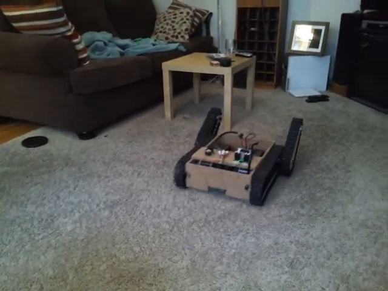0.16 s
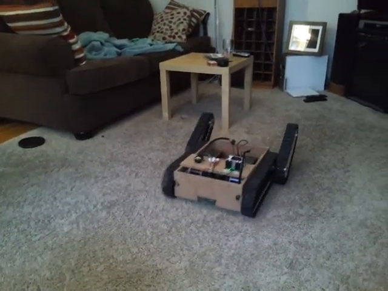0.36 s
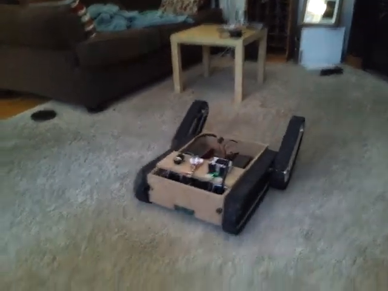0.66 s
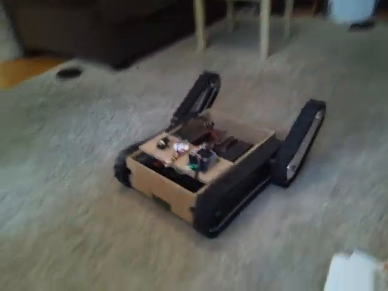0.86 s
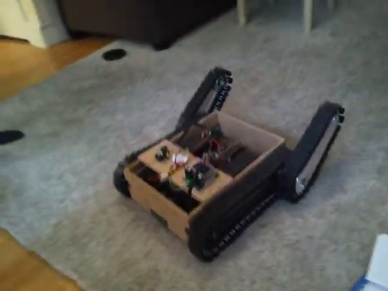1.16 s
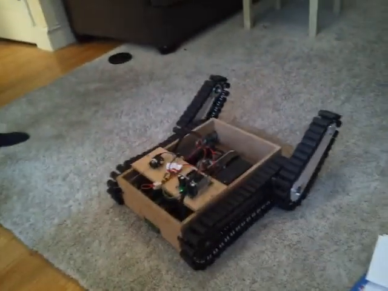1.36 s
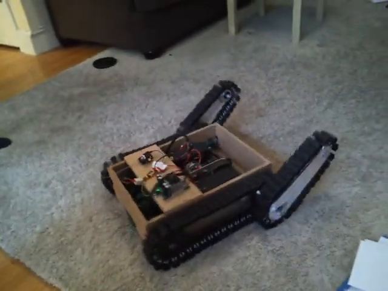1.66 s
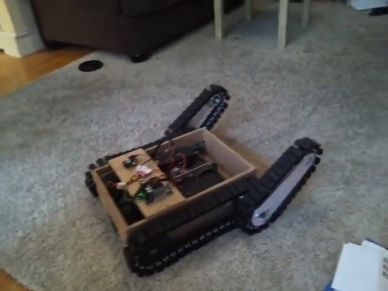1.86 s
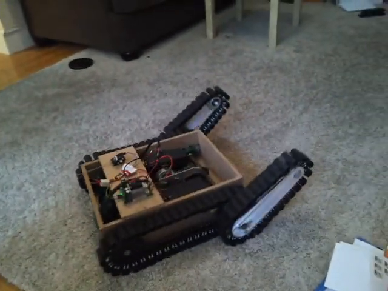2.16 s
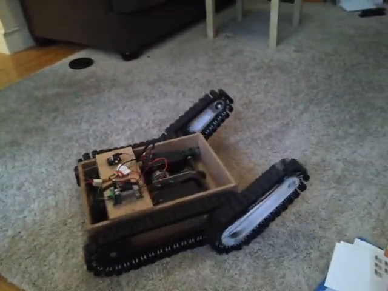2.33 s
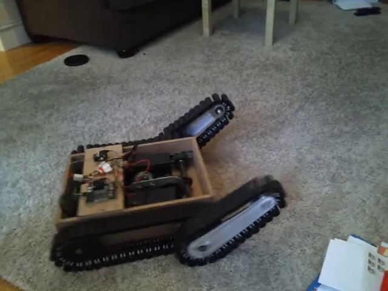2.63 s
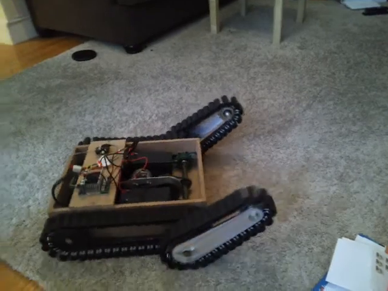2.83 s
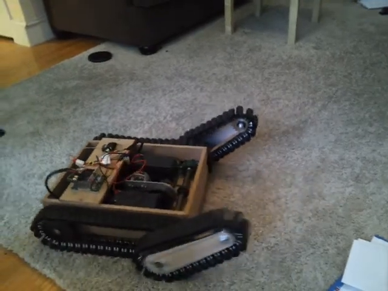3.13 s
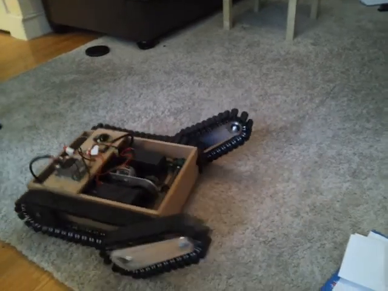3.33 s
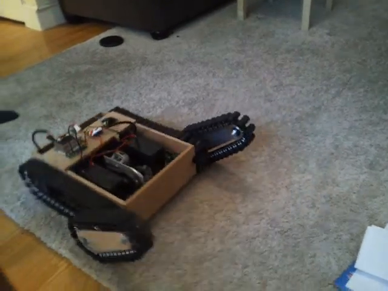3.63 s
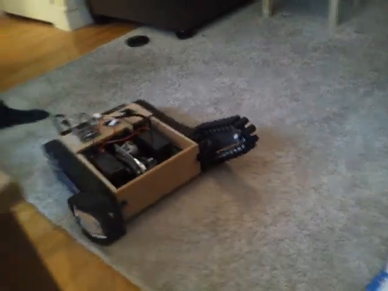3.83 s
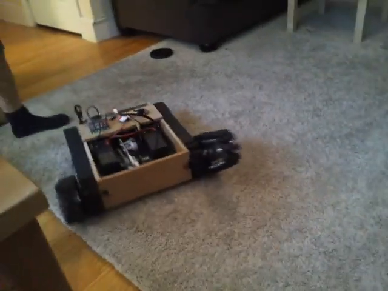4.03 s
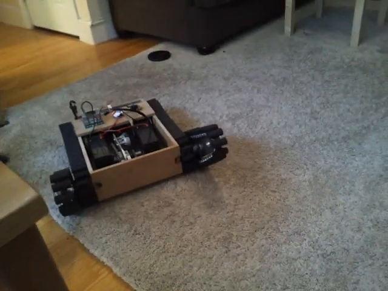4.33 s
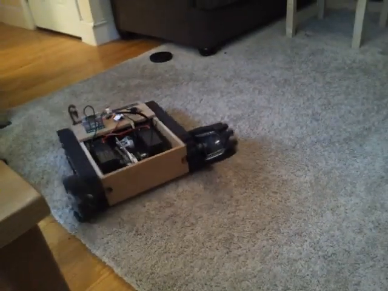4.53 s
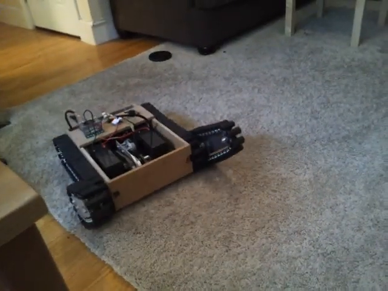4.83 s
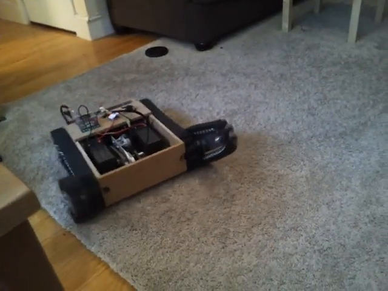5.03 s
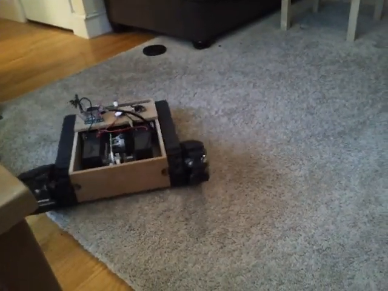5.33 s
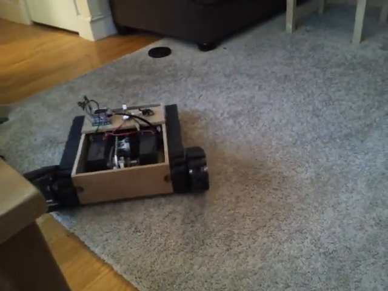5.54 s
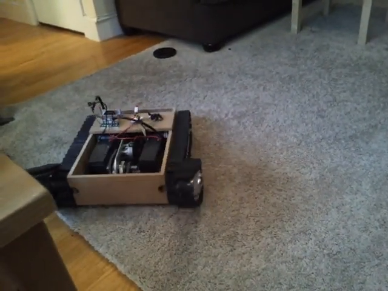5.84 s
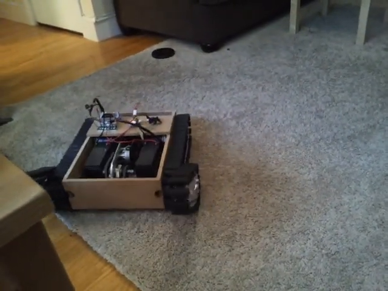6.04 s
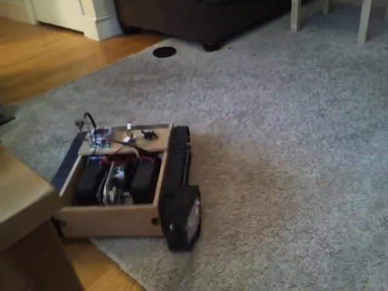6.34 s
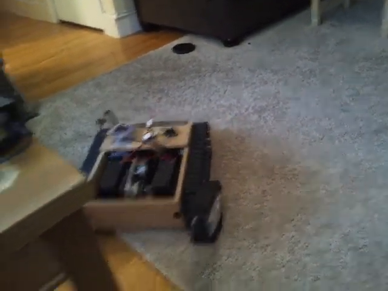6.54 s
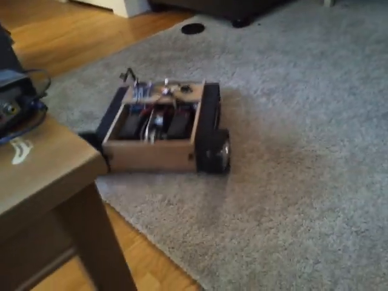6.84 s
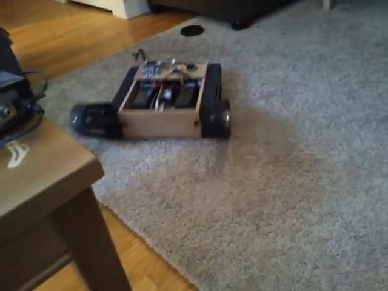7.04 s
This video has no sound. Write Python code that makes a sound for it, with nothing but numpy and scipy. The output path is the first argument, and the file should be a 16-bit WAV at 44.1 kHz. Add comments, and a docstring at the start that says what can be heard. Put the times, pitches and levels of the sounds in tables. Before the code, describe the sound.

Short bursts of chain drive and motor gears in a furnished room. First a knock and a rapid clatter that peaks before one second and fades; a brief jerk; a long ticking crawl, faintly squealing, that speeds up around four seconds; then several stop-start twitches with woody thumps, finally a strong run. Faint steady room noise and low rumble lie beneath. The small microphone sounds bright and slightly crushed on the loudest snaps.

```python
"""A last faint rattle over the quiet of a living room, then a small tracked robot with a wooden box body
knocks into motion on a carpet; it starts, stops and turns. Chain links tick over the sprockets and merge into
a rattle with speed, gears grind into the box, and the box knocks when the drive takes up its slack.
The direct sound leads the room; a small microphone that peaks near 5 kHz overloads on the loudest bursts."""
import sys
import numpy as np
from scipy import signal
from scipy.io import wavfile
from scipy.ndimage import uniform_filter1d, minimum_filter1d

SR = 44100
rng = np.random.default_rng(int(sys.argv[2]) if len(sys.argv) > 2 else 0)


def master(y):
    """Save y as 16-bit WAV."""
    cut = np.clip(np.atleast_2d(y).T, -1, 1)
    pcm = np.round(cut * 32767)  # scale
    wavfile.write(sys.argv[1], SR, pcm.astype(np.int16))


N = 316638  # samples


def gain_of(db):
    """Decibels to an amplitude factor."""
    return 10 ** (np.asarray(db) / 20)


def evened(x):
    """Scales to an rms of one."""
    return x / np.sqrt(np.mean(x ** 2) + 1e-20)


def read(points, hz):
    """Looks up a spectrum on a log-frequency axis."""
    f, value = np.transpose(points)
    return np.interp(np.log(hz + 1), np.log(f + 1), value)


def colour(x, points):
    """Minimum-phase filter of the given spectrum: a click keeps its sharp front."""
    level_db = read(points, abs(np.fft.fftfreq(4096, 1 / SR)))
    log_gain = np.log(gain_of(np.maximum(level_db, -100)))
    spectrum = np.exp(np.conj(signal.hilbert(log_gain)))
    taps = np.fft.ifft(spectrum).real[:2048]
    return signal.oaconvolve(x, taps / np.linalg.norm(taps))[:len(x)]


def resonate(x, hz, width):
    """Shifts the pitch hz down to zero, smooths, and shifts back: a resonance of gain one."""
    turn = np.exp(2j * np.pi * np.cumsum(hz * np.ones(len(x))) / SR)
    r = np.exp(-np.pi * width / SR)
    return 2 * (turn * signal.lfilter([1 - r], [1, -r], x / turn)).real


def resonate_twice(x, hz, width):
    """Two equal resonances in a row, for steeper skirts; rms one."""
    return evened(resonate(resonate(x, hz, width), hz, width))


def add(mix, s, sound):
    """Mixes a sound in at a time."""
    part = mix[round(s * SR):][:len(sound)]
    part += sound[:len(part)]


def played(tables, column, silent=-90):
    """One column for every sample; each table coasts to silent in 1/4 s unless the next takes over."""
    out, t = np.full(N, float(silent)), np.arange(N) / SR
    for rows in map(np.array, tables):
        later = t >= rows[0, 0]
        times = [*rows[:, 0], rows[-1, 0] + 1 / 4]
        out[later] = np.interp(t[later], times, [*rows[:, column], silent])
    return out


def blows(per_s, spread_db, decay):
    """Random blows, each a dying burst of noise; the spread makes a few much larger; rms one at any rate."""
    strikes = np.minimum(rng.exponential(1, N), 4)
    size = gain_of(spread_db * strikes) * (rng.random(N) < per_s / SR)
    power = signal.lfilter([1], [1, -np.exp(-2 / (decay * SR))], size ** 2) / per_s
    return evened(np.sqrt(power) * rng.standard_normal(N))


def waver(per_s):
    """Slow random drift of rms one: 24 sines no faster than per_s."""
    t, hz = np.arange(0, N, 64) / SR, np.geomspace(per_s / 8, per_s, num=24)
    slow = np.sin(2 * np.pi * (hz[:, None] * t + rng.random((len(hz), 1)))).sum(0)
    return np.interp(np.arange(N) / SR, t, evened(slow))


# the room at rest, as the microphone hears it: (frequency [Hz], level [dB])
QUIET_SPECTRUM = [(40, -30), (70, -13), (130, -12), (240, -7), (310, -9), (370, -25), (640, -28),
                  (1200, -31), (2000, -31), (3500, -27), (4900, -20), (6100, -28), (6800, -45), (8800, -77)]


def quiet_room():
    """Steady noise in the colour of the room at rest."""
    return gain_of(-49.5) * evened(colour(rng.standard_normal(N), QUIET_SPECTRUM))


# pace of the drive, one table a burst, as chain rattle: (time [s], level [dB])
DRIVE_BURSTS = [
    [(0.0, -44.5), (0.06, -58)],
    [(0.09, -38.5), (0.34, -32), (0.65, -13), (0.79, -10.5), (0.86, -9), (1.0, -10), (1.168, -18.5),
     (1.388, -30.5), (1.52, -50.5)],
    [(1.59, -31.5), (1.768, -26.5), (1.874, -31), (1.956, -49), (2.0, -52.5)],
    [(2.06, -52), (2.12, -44), (2.2, -37), (2.9, -31), (3.23, -28.5), (3.56, -28.5), (3.87, -22),
     (3.98, -17.5), (4.12, -11), (4.22, -20.5), (4.35, -37.5), (4.46, -54.5)],
    [(4.56, -37), (4.622, -36.5), (4.738, -26.5), (4.8, -17.5), (4.926, -42), (5.0, -54)],
    [(5.1, -43), (5.158, -37), (5.2, -25.5), (5.284, -20.5), (5.366, -26), (5.536, -32), (5.63, -45)],
    [(5.645, -44.5), (5.761, -38), (6.059, -39.5), (6.109, -47)],
    [(6.15, -37.5), (6.23, -35), (6.286, -26), (6.458, -21), (6.66, -40.5)],
    [(6.67, -32.5), (6.718, -25), (6.89, -17), (7.004, -12.5), (7.07, -12), (7.18, -8)],
]
# steel links as the microphone colours them: (frequency [Hz], level [dB])
CHAIN_SPECTRUM = [(710, -25.5), (1200, -18), (1320, -15.5), (1460, -16.5), (1880, -17.5), (2040, -16),
                  (2500, -12.5), (2850, -8), (3490, -10), (4460, -4), (5010, -2.5), (5710, -8), (6800, -28),
                  (8840, -63.5), (15000, -120)]


def rattle():
    """Link blows too many to count; the faster the chain, the denser they fall."""
    level_db = played(DRIVE_BURSTS, column=1)
    links_per_s = np.clip(200 * gain_of(.3 * (level_db + 25)), 180, 2000)
    links = blows(links_per_s, spread_db=3.6, decay=.003)
    sliding = rng.standard_normal(N)  # rollers and rubber pads scuffing
    sliding_share = np.interp(level_db, [-36, -20], [.6, .85])
    return gain_of(level_db) * evened(colour(links + sliding_share * sliding, CHAIN_SPECTRUM))


def paced(full_db, share):
    """Level in dB of a layer that follows a share of the drive's fall below full pace."""
    full_pace_db = -10  # rattle level at full pace
    return full_db + share * (played(DRIVE_BURSTS, column=1) - full_pace_db)


def per_burst(values):
    """The value of the latest burst to start, for every sample."""
    starts = [rows[0][0] for rows in DRIVE_BURSTS]
    return np.array(values)[np.maximum(np.searchsorted(starts, np.arange(N) / SR) - 1, 0)]


def strain(column):
    """After each knock the load on the gears rises, holds and dies away: a gain for one layer."""
    rise_s, hold_s, fall_db_per_s = 0.0077, 0.02, 225  # hold counts from the knock, rise included
    t, out = np.arange(N) / SR, np.zeros(N)
    for row in KNOCK_EVENTS:
        since = t - row[0]
        fall_db = fall_db_per_s * np.maximum(since - hold_s, 0)
        out += np.clip(since / rise_s, 0, 1) * gain_of(row[column] - fall_db)
    return out


# gear grind heard through the box: (frequency [Hz], level [dB])
GEAR_SPECTRUM = [(41, -45.5), (70, -37), (253, -11), (336, -3.5), (372, 8), (472, 0), (616, 4), (904, 1),
                 (2040, -4.5), (2400, -12), (3120, -26), (5280, -120)]
# box panels singing under the gears: (frequency [Hz], width of each pass [Hz], level [dB])
HUM_PANELS = [(347.5, 75, -5), (619.4, 45, -17.5)]
# a steadier hum at full pace: (start [s], end [s], level [dB])
DRONE_SPELLS = [(0.7, 0.76, -31), (0.864, 1.178, -30)]
# gear load in each burst; turning on the spot loads them otherwise than rolling: (level [dB])
BURST_LOAD = [0, 2, 0.5, 0.5, 0, -2.5, 0, -3, 0.5]
# soft band near 700 Hz against the grind, in each burst: (level [dB])
BURST_CRAWL = [-15, -14, -9, -3.5, -15, -13, -10.5, -13, -14]


def gears():
    """Uneven tooth blows pass the box and set its panels humming; at a crawl one soft band stands out."""
    teeth = blows(600, spread_db=0.0, decay=0.0049)
    level_db = paced(full_db=-25.5, share=0.76) + per_burst(BURST_LOAD)
    grind = (gain_of(level_db) + strain(column=5)) * evened(colour(teeth, GEAR_SPECTRUM))

    hum = sum(gain_of(db) * resonate_twice(teeth, hz, width) for hz, width, db in HUM_PANELS)
    hum_db = paced(full_db=-34, share=0.63) + 4.5 * waver(8.1)
    hum_gain = gain_of(hum_db) + strain(column=6)

    treads = blows(120, spread_db=2.0, decay=0.006)  # track pads dropping one by one
    slowness = np.clip((-28.0 - level_db) / 14, 0, 1)
    crawl = slowness * resonate_twice(treads, hz=727, width=180)
    crawl_gain = gain_of(level_db + per_burst(BURST_CRAWL))

    spells = [[(start, db), (end, db)] for start, end, db in DRONE_SPELLS]
    drone = gain_of(played(spells, column=1)) * resonate_twice(teeth, hz=340, width=22)
    return grind + crawl_gain * crawl + hum_gain * hum + drone


# deep rumble: (time [s], level [dB])
RUMBLE_LEVEL = [(0.0, -49), (0.24, -53), (0.56, -40.5), (3.0, -53.5), (3.46, -40), (4.42, -45.5),
                (4.48, -62), (4.84, -34), (4.96, -52.5), (6.34, -51), (6.42, -41.5), (6.86, -36),
                (7.18, -45)]


def rumble():
    """Noise around 17 Hz: a deep, lumpy rumble that swells and wavers."""
    lumps = resonate_twice(rng.standard_normal(N), hz=17, width=18)
    return gain_of(played([RUMBLE_LEVEL], column=1) + 4 * waver(4.7)) * lumps


def small_links():
    """Rows of lesser ticks at random times, a little above the rattle for the most part."""
    per_s, over_db, spread_db, ring_hz = 19, 4.5, 3.5, (3840, 5400)
    place, size, spot = rng.random((round(N / SR * per_s), 3)).T
    rattle_db = played(DRIVE_BURSTS, column=1)[(place * N).astype(int)]
    peak_db = rattle_db + over_db - spread_db * np.log(size + 1e-2)
    return np.c_[place * N / SR, peak_db, np.interp(spot, [0, 1], ring_hz)].tolist()


# the clearest links snapping on to a tooth: (time [s], peak level [dB], ring centre [Hz])
CLEAR_TICKS = [(0.0917, -31, 4660), (0.1702, -13.5, 5140), (0.193, -12, 4770), (0.2295, -12, 4590),
               (0.2863, -7, 4640), (0.3607, -9, 5130), (0.375, -7, 4570), (0.4285, -3, 4830),
               (0.4492, -3, 5300), (0.4953, -5, 4660), (0.527, -6, 4980), (0.5622, -2, 4340),
               (0.5958, -2, 4860), (0.6377, -6, 5270), (0.7033, -1, 4840), (0.7487, 0, 4970),
               (1.0082, -5.5, 4570), (1.0625, -1.5, 4680), (1.1722, -10, 4870), (1.1924, -9, 4890),
               (1.2091, -3, 5200), (1.3457, -8, 4460), (1.5962, -8.5, 5400), (1.636, -14.5, 4990),
               (1.724, -3, 4700), (1.7892, -3.5, 5100), (1.8231, -11.5, 4550), (2.1423, -15.5, 4330),
               (2.3787, -11.5, 4270), (2.4673, -17, 4740), (2.4783, -13, 4590), (2.5768, -8, 4720),
               (2.6658, -9.5, 4930), (2.7477, -6.5, 5100), (2.8169, -7, 5300), (2.834, -12, 4060),
               (2.943, -11, 3800), (2.9807, -9.5, 3600), (2.9933, -8.5, 5510), (3.0647, -8.5, 4840),
               (3.0928, -8, 4870), (3.1595, -10, 4680), (3.1924, -4.5, 2870), (3.2068, -4.5, 4680),
               (3.2421, -8, 5340), (3.279, -5.5, 4970), (3.3547, -1, 5030), (3.4268, -7.5, 3950),
               (3.4699, -10, 4870), (3.5442, -4.5, 4850), (3.5739, -7.5, 4060), (3.601, -3, 4250),
               (3.6475, -2.5, 4470), (3.7083, -2, 5090), (3.7594, -2.5, 5100), (3.7843, -7.5, 5400),
               (3.8452, -5.5, 5420), (3.8677, -5, 5390), (3.895, 0, 4970), (3.937, 2.5, 4600),
               (3.9701, 5, 4400), (4.0006, 1, 4500), (4.0308, -1.5, 4810), (4.0883, -3, 4510),
               (4.1172, -10, 5120), (4.148, -4, 4640), (4.2054, -5.5, 4860), (4.2338, -4.5, 4870),
               (4.3162, -6.5, 4410), (4.5701, -16.5, 4130), (4.6337, -8.5, 2800), (4.673, -10.5, 5350),
               (4.7008, -1.5, 4560), (4.7437, -8.5, 5260), (4.7592, -19, 2720), (4.7872, -3, 4400),
               (4.8015, -6, 4750), (5.0926, -28.5, 5090), (5.1098, -14.5, 4240), (5.1168, -11, 5070),
               (5.1543, -13, 4790), (5.1747, -8.5, 4480), (5.2008, -2, 4600), (5.25, -2.5, 2900),
               (5.3997, -7, 4220), (5.478, -4.5, 5000), (5.5481, -14, 5000), (5.654, -14.5, 4200),
               (5.685, -13.5, 4240), (5.7885, -5.5, 4900), (6.0103, -20, 5020), (6.0407, -14, 4130),
               (6.1553, -21, 4930), (6.1824, -16, 4040), (6.2113, -8.5, 4500), (6.2847, -20, 5350),
               (6.2961, -7, 4740), (6.3266, -8, 5020), (6.369, -1, 4970), (6.4034, -5, 4910),
               (6.4199, -7, 4930), (6.4656, -10, 5120), (6.6728, -9, 4580), (6.6892, -8, 4610),
               (6.7059, -9, 5130), (6.745, -8, 5340), (6.7615, -4, 5140), (6.8091, -2.5, 4840),
               (6.8404, -4, 4980), (6.8918, -5.5, 2730), (6.9082, -4.5, 5120), (6.9445, -3, 4830),
               (6.9782, 3.5, 4900), (7.0385, 6.5, 4670), (7.0679, -4, 4970), (7.0934, -2, 4450)]


def ticks():
    """Each link gives a sharp click and a short crack, coloured by where it lands, then a weak jingle."""
    out, t = np.zeros(N), np.arange(1600) / SR
    rows = list(CLEAR_TICKS) + small_links()
    noises, plates = rng.standard_normal((len(rows), len(t))), rng.random(len(rows))
    for (s, db, hz), noise, plate in zip(rows, noises, plates):
        length = .0017 * gain_of(.22 * (db + 20))  # seconds; harder snaps last longer
        click = 3.1 * (t == 0)
        crack = click + noise * (np.exp(-t / length) + 0.25 * np.exp(-t / 0.0046))
        side_plate = 1.6 * plate * resonate(crack, 2830, 230)  # the metal side plate rings more or less
        crack = colour(.4 * crack + resonate(crack, hz, 850) + side_plate, CHAIN_SPECTRUM)
        add(out, s, gain_of(db) * crack / abs(crack).max())
    return out


# slack taken up, a blow into the box, then the gears strain:
# (time [s], peak level [dB], favoured pitch [Hz], narrowness [dB per octave], shudder length [s],
#  strain grind level [dB], strain hum level [dB])
KNOCK_EVENTS = [(0.101, -21, 804, 13, 0.054, -40, -24.5), (1.596, -16.5, 850, 20, 0.045, -44, -28.5),
                (2.468, -30, 700, 6, 0.015, -45, -56), (4.104, -14, 600, 12, 0.037, -30, -26),
                (4.572, -22.5, 820, 5, 0.026, -46, -35), (4.798, -15.5, 520, 16, 0.019, -29.5, -32),
                (5.108, -18, 710, 11.5, 0.023, -54, -28), (6.182, -24, 870, 19, 0.009, -62, -36),
                (6.374, -5.5, 655, 19.5, 0.022, -29, -33), (6.568, -16, 770, 25, 0.0041, -44, -33),
                (6.697, -18.5, 500, 4, 0.14, -35.5, -32), (7.107, -10, 605, 4, 0.035, -17.5, -20)]
# modes of the wooden box: (frequency [Hz], width of the first pass [Hz], level [dB])
BOX_MODES = [(287, 91, 16.5), (315, 20.4, -2), (520, 34, 5.5), (636, 96, 11), (720, 27, -21.5),
             (837, 88, 9.5), (944, 170, -8.5), (1350, 170, 9), (1630, 64, -17)]


def knocks():
    """A blow and its shudder ring the box; the spot struck favours the modes near one pitch."""
    out, t = np.zeros(N), np.arange(9000) / SR
    noises = rng.standard_normal((len(KNOCK_EVENTS), len(t)))
    for (s, db, centre, narrow, length, *_), noise in zip(KNOCK_EVENTS, noises):
        shudder = noise * (np.exp(-t / .005) + .4 * np.exp(-t / max(length, .004)))
        shake = 25 * (t == 0) + shudder
        ring = np.zeros(len(t))
        for hz, width, mode_db in BOX_MODES:
            mode_gain = gain_of(mode_db - narrow * abs(np.log2(hz / centre)))
            ring += mode_gain * evened(resonate(resonate(shake, hz, width), hz, 4 * width))
        add(out, s, gain_of(db) * ring / abs(ring).max())
    return out


# thin motor squeal at crawling speed:
# (start [s], end [s], start level [dB], end level [dB], favoured pitch [Hz])
SQUEAL_SPELLS = [(2.061, 2.4, -46, -43, 3870), (2.397, 2.97, -43, -40.5, 3730),
                 (5.805, 6.02, -38, -40.5, 4250)]
# motor casing rings: (frequency [Hz], width of each pass [Hz])
CASING_RINGS = [(3690, 150), (3930, 83), (4300, 140)]


def squeal():
    """Broken puffs ring the motor casing in a few thin, fuzzy lines."""
    spells = [[(start, db, hz), (end, end_db, hz)] for start, end, db, end_db, hz in SQUEAL_SPELLS]
    favoured_hz = played(spells, column=2, silent=4000)
    puffs = blows(220, spread_db=2.0, decay=.006)
    lines = np.zeros(N)
    for hz, width in CASING_RINGS:
        off_khz = abs(favoured_hz - hz) / 1e3
        lines += gain_of(-13 * off_khz) * resonate_twice(puffs, hz, width)  # 13 dB per kHz
    return gain_of(played(spells, column=1)) * lines


# how long the living room rings: (frequency [Hz], time to fall 60 dB [s])
ROOM_DECAY = [(300, 0.59), (1000, 0.27), (3000, 0.31), (6000, 0.19)]


def room(x):
    """Sparse echoes of random sign, one in every 20 samples, each band dying at its own speed."""
    taps = np.zeros(SR // 2)
    at = np.arange(220, len(taps) - 20, 20)  # first echo about 5 ms after the direct sound
    taps[at + rng.integers(0, 20, len(at))] = rng.choice([-1., 1.], len(at))
    hz, t, z = signal.stft(taps, SR, nperseg=256)
    decay = gain_of(-60 * t / read(ROOM_DECAY, hz)[:, None])
    tail = signal.istft(z * decay, SR, nperseg=256)[1]
    return signal.fftconvolve(x, tail / np.linalg.norm(tail))[:N]


def scene():
    """Blows get much of the room, steady layers less; all over the quiet of the room."""
    hits = ticks() + knocks()
    steady = rattle() + gears() + squeal()
    echoes = room(gain_of(-4.5) * hits + gain_of(-15.0) * steady)
    return (hits + steady + echoes + rumble() + quiet_room())[None]


def record(dry):
    """The microphone fades out above 8.2 kHz; a limiter that catches single waves sprays thin treble."""
    heard = signal.sosfilt(signal.butter(8, 8200, fs=SR, output="sos"), dry)
    ceiling = .74  # of full scale
    gain = minimum_filter1d(ceiling / np.maximum(abs(heard), ceiling), size=3)
    limited = heard * uniform_filter1d(gain, size=3)
    edge = signal.firwin(511, 15800, window=("kaiser", 9), fs=SR)  # the sprayed treble ends at 15.8 kHz
    return signal.oaconvolve(limited, edge[None], "same")


dry = scene()
out = record(dry)
master(out)
```